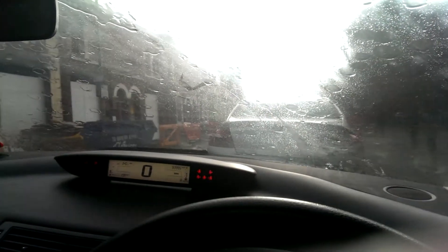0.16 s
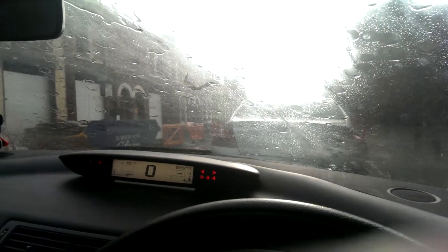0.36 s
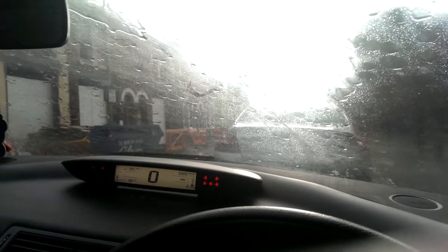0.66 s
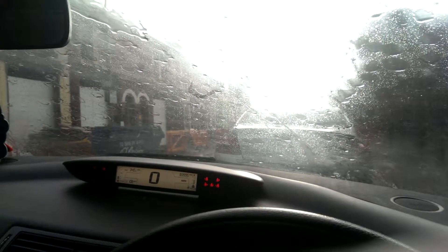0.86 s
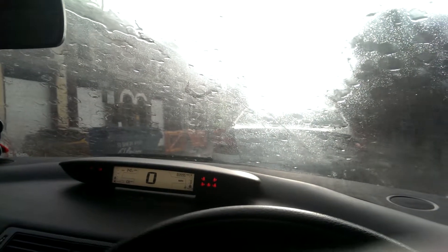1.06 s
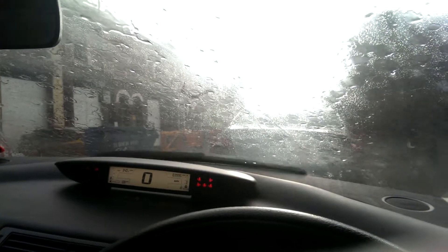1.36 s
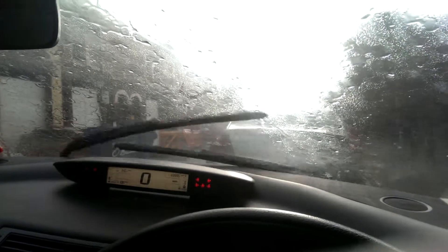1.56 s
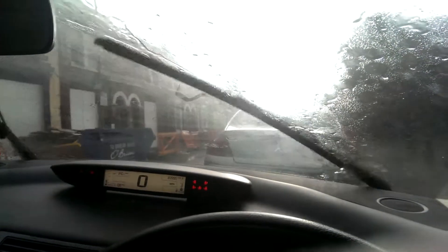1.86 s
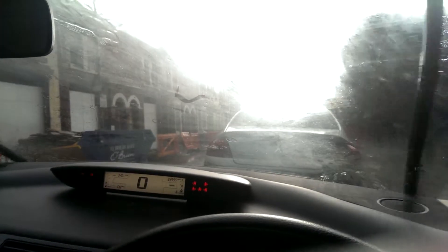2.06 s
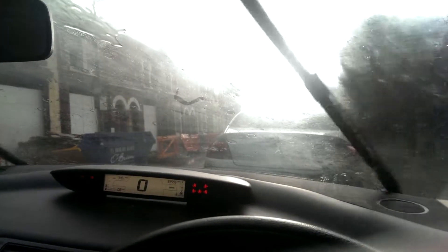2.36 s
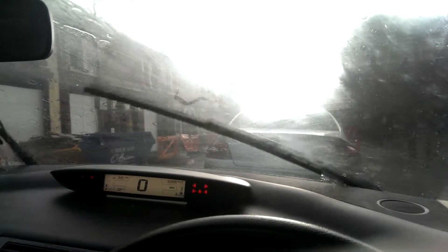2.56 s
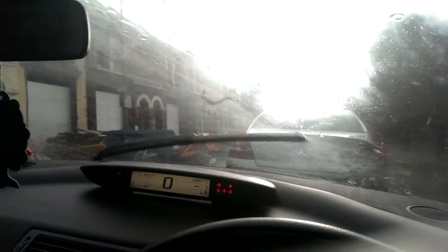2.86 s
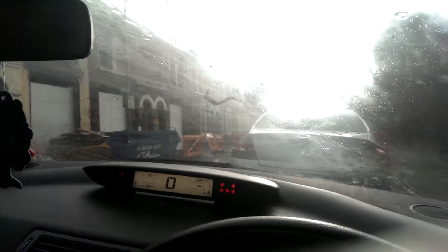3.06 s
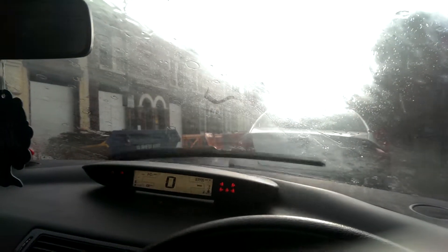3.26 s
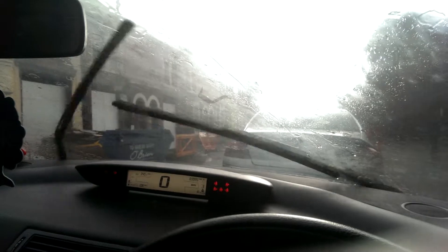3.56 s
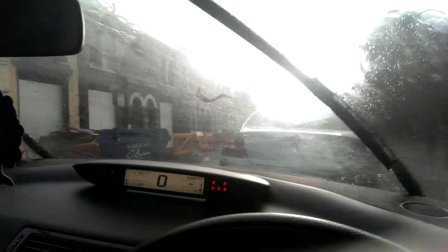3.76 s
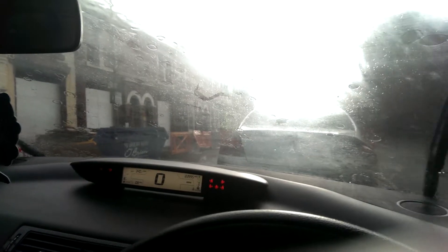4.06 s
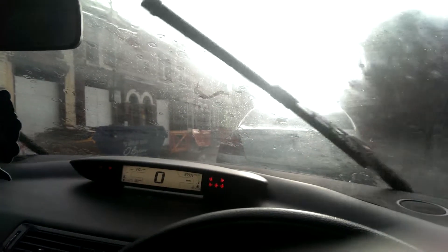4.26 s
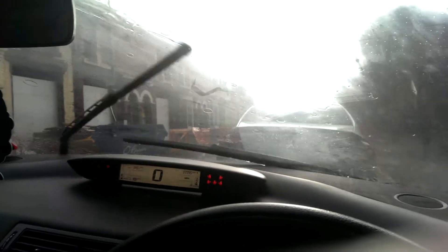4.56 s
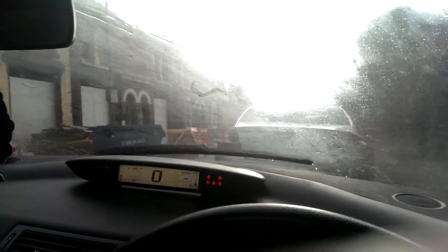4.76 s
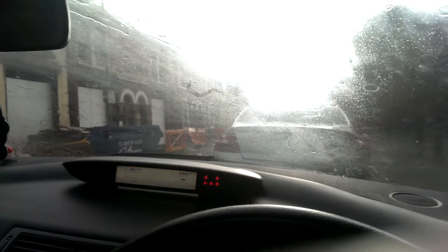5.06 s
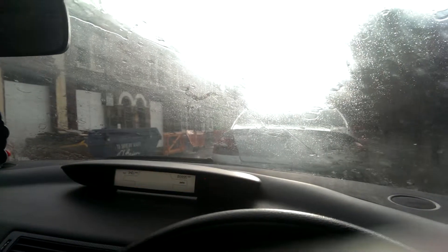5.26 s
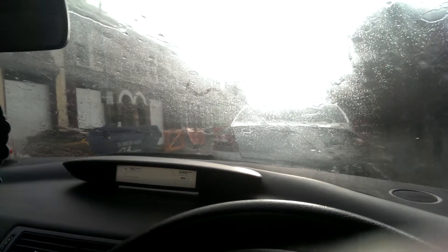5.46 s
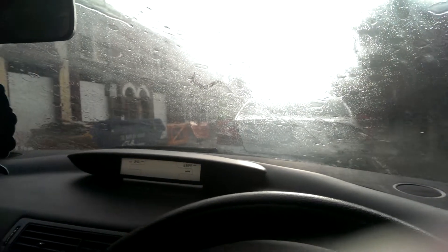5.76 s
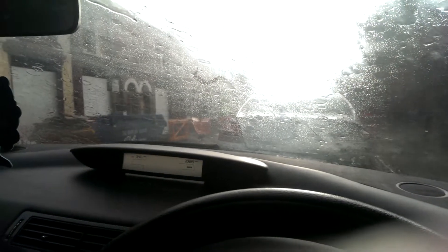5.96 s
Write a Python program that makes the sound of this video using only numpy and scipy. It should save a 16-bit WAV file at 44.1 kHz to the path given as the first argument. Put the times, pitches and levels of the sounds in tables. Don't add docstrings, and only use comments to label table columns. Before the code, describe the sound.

Steady downpour heard from a car cabin: grainy patter on glass over a boxy roof rumble, with scattered heavy drops. The wipers make two sweeps in the middle, thumping low and woody at the turns and shaking the dashboard, the second one stuttering against the glass. They come to rest, leaving rain and one sharp splat near the end. The handheld-style stereo pickup is muffled, slightly hissy, with wide treble and centred bass.

```python
import sys
import numpy as np
from scipy import signal
from scipy.fft import rfft, irfft, next_fast_len
from scipy.io import wavfile

SR = 44100
rng = np.random.default_rng(int(sys.argv[2]) if len(sys.argv) > 2 else 0)


def digitize_waveform(pressure):
    field = np.atleast_2d(pressure).T
    bounded = np.clip(field, -1, 1)
    quanta = np.round(bounded * 32767).astype(np.int16)
    wavfile.write(sys.argv[1], SR, quanta)


def volts(x):
    e = np.asarray(x, float) / 20
    return 10 ** e


N = 270333
GLASS_FROM_HZ, ROOF_TO_HZ = 1043, 1330
MEAN_RAIN_DB = -36


def rms_one(x):
    return x / np.sqrt(np.mean(x ** 2) + 1e-20)


def in_time(rows):
    s, *columns = np.transpose(rows)
    return [np.interp(np.arange(N) / SR, s, c) for c in columns]


def at_hz(points, hz):
    table_hz, value = np.transpose(points)
    return np.interp(np.log(hz + 1), np.log(table_hz), value)


def drift(rate_hz):
    step = 40
    r = np.exp(-2 * np.pi * rate_hz * step / SR)
    noise = rng.standard_normal(N // step + 2002)
    slow = signal.lfilter([1], [1, -2 * r, r * r], noise)[2000:]
    return np.interp(np.arange(N) / step, np.arange(len(slow)), rms_one(slow))


def colour(x, db_at):
    size = 8192
    ceps = irfft(db_at(np.fft.rfftfreq(size, 1 / SR)) * np.log(10) / 20)
    ceps[..., 1:size // 2] *= 2
    ceps[..., size // 2 + 1:] = 0
    kernel = np.atleast_2d(irfft(np.exp(rfft(ceps))))
    return signal.oaconvolve(np.atleast_2d(x), kernel, axes=-1)[:, :N]


def band(x, low_hz, high_hz):
    sos = signal.butter(3, [low_hz, high_hz], "band", fs=SR, output="sos")
    return signal.sosfilt(sos, x)


def bursts(times_s, peak_db, t60_s, rise_s, longer_db=0):
    length = 9000
    out, t = np.zeros(N + length), np.arange(length) / SR
    for s, db in zip(times_s, peak_db):
        at = round(s * SR)
        own_t60_s = max(t60_s * volts(longer_db * (db - max(peak_db))), 0.01)
        out[at:at + length] += volts(db - 60 * t / own_t60_s) * np.minimum(t / rise_s, 1)
    return out[:N]


# (frequency [Hz], density [dB per Hz])
CABIN_COLOUR = [(120, -26.5), (200, -10), (308, 2), (388, -3), (529, -5), (646, -0.5), (731, -4.5),
                (1090, -2.5), (1310, -6.5), (1960, -2), (2360, -3), (2930, -2), (4520, -16.5),
                (5880, -35.5), (8000, -54.5), (10400, -73.5), (17600, -120)]
# (frequency [Hz], width [Hz], level [dB])
CABIN_RESONANCES = [(393, 290, 10), (1020, 130, 1), (2930, 420, -1.5), (317, 92, -7.5), (2480, 410, -1.74),
                    (3700, 610, 2.16)]


def cabin_db(hz):
    peaks_db = sum(db / (1 + ((hz - f) / (w / 2)) ** 2) for f, w, db in CABIN_RESONANCES)
    return at_hz(CABIN_COLOUR, hz) + peaks_db


# (frequency [Hz], likeness [0-1])
PORT_LIKENESS = [(60, 1), (200, 0.98), (350, 0.86), (600, 0.66), (1000, 0.46), (1600, 0.012)]


def ports(pair):
    size = next_fast_len(N)
    alike = np.clip(at_hz(PORT_LIKENESS, np.fft.rfftfreq(size, 1 / SR)), 0, 1)
    mid, side = rfft(pair, size) * np.sqrt([1 + alike, 1 - alike])
    return irfft(np.array([mid + side, mid - side]), size)[:, :N] / np.sqrt(2)


# (time [s], level [dB])
DOWNPOUR = [(0, -29), (.42, -34), (.85, -33), (1.24, -36), (1.6, -33.5), (1.8, -35), (1.95, -41),
            (2.6, -37), (2.92, -42), (3.5, -37.5), (3.96, -36.5), (4.2, -31.5), (4.45, -37.5), (4.64, -32),
            (4.9, -42), (5.5, -35.5), (5.92, -33), (6.13, -35)]
# (time [s], level [dB], length [s])
GUSTS_AND_LULLS = [(0.24, 1, 0.066), (1.515, 3.5, 0.01), (1.65, 3, 0.15), (2.044, -3, 0.035),
                   (2.511, 2.5, 0.016), (2.63, 1.5, 0.075), (2.89, -5, 0.051), (3.09, -1.5, 0.085),
                   (3.555, 3.5, 0.016), (3.735, 4, 0.028), (4.067, 3, 0.014), (4.293, 3.5, 0.02),
                   (4.622, 1.5, 0.077), (5.067, 3, 0.12), (4.03, 1.5, 0.018), (3.177, 3, 0.02),
                   (4.703, -0.5, 0.041), (5.213, 4, 0.051), (5.39, -3, 0.036), (5.93, 2.5, 0.033)]


def downpour():
    t = np.arange(N) / SR
    gusts_db = sum(db * np.exp(-((t - s) / length) ** 2) for s, db, length in GUSTS_AND_LULLS)
    return in_time(DOWNPOUR)[0] - MEAN_RAIN_DB + gusts_db


def drops(per_s, spread_db, clump_db):
    sizes = volts(spread_db * np.minimum(rng.exponential(1, N), 4.3)) * rng.choice([-1, 1], N)
    born = rng.random(N) < per_s / SR
    return sizes * born * volts(clump_db * (1.6 * drift(8.9) + 0.16 * drift(30)))


def panels(hits, t60_s, crack_db, count=11):
    t = np.arange(6000) / SR
    shape = volts(-60 * t / t60_s) + volts(crack_db - 60 * t / 0.015)
    size = next_fast_len(N + len(t))
    spot = rng.integers(0, count, N)
    out = 0
    for k in range(count):
        answer = rng.standard_normal((2, len(t))) * shape
        out = out + rfft(hits * (spot == k), size) * rfft(answer, size)
    return irfft(out, size)[:, :N]


# (frequency [Hz], density [dB per Hz])
LEAK_COLOUR = [(3240, -16), (5500, -3.5), (6630, -15.5), (8200, -17), (9880, -21), (14800, -23),
               (15900, -22)]


def rain():
    swing_db = downpour()
    hits = drops(per_s=2600, spread_db=3.5, clump_db=0.11)
    shower = ports(panels(hits, t60_s=0.063, crack_db=4.5))
    drumming = ports(panels(hits, t60_s=0.11, crack_db=-8.5))
    glass = rms_one(band(colour(shower, cabin_db), GLASS_FROM_HZ, 12600))
    roof = rms_one(band(colour(drumming, cabin_db), 184, ROOF_TO_HZ))
    leak = rms_one(colour(shower, lambda hz: at_hz(LEAK_COLOUR, hz)))
    out = volts(MEAN_RAIN_DB + swing_db + 2.5) * glass
    out += volts(-37 + 0.86 * swing_db) * roof
    return out + volts(-70.5 + 1.5 * swing_db) * leak


# (time [s], peak [dB], thud [dB], left-right [dB])
HEAVY_DROPS = [(0.0132, -18, -34, 2), (0.189, -19.5, -33, 11), (0.62, -21, -38, -1),
               (0.814, -16.5, -36, -2), (1.065, -17, -27, 0), (1.2974, -20, -43, -1),
               (1.3504, -18, -41, -1), (1.43, -21, -38, 10), (1.4623, -16.5, -25, 0), (1.601, -19, -25, -1),
               (1.696, -32, -26, -7), (2.0874, -21.5, -38, -2), (2.1817, -21.5, -36, -2),
               (2.262, -25.5, -37, -1), (2.375, -29, -40, 3), (2.48, -23, -41, 0), (2.926, -28.5, -49, 4),
               (3.0205, -21.5, -26, 0), (3.2196, -24, -30, -3), (3.568, -29, -40, -5),
               (3.8876, -23.5, -36, 5), (4.0103, -22, -37, -2), (4.044, -28, -37, 2), (4.128, -21, -23, -4),
               (4.3088, -15.5, -36, -6), (4.844, -22.5, -30, 2), (5, -23, -31, -4), (5.1175, -14.5, -42, 2),
               (5.168, -27, -27, 2), (5.696, -36, -29, -7)]


def heavy_drops():
    t60_s, rise_s = 0.097, 0.0023
    s, peak_db, thud_db, pan_db = np.transpose(HEAVY_DROPS)
    noise = ports(rng.standard_normal((2, N)))
    grain = colour(noise, lambda hz: cabin_db(hz) + 7.4 * np.log2(1 + hz / 2500))
    splat = np.array([bursts(s, peak_db - 7 + side * pan_db / 2, t60_s, rise_s) for side in (1, -1)])
    thud = bursts(s, thud_db - 6, 1.7 * t60_s, 2 * rise_s)
    out = splat * rms_one(band(grain, GLASS_FROM_HZ, 7000))
    return out + thud * rms_one(band(grain, 230, ROOF_TO_HZ))


# (frequency [Hz], density [dB per Hz])
BODY_COLOUR = [(12, -71), (20, -39), (48, -27.5), (85, -6), (94, -15), (107, -2.5), (140, -2.5), (172, 2),
               (211, -6), (300, -15.5), (390, -42.5), (660, -120)]
# (time [s], level [dB])
MOTOR_LOAD = [(0.0, -33), (0.03, -58), (0.51, -71), (2.03, -50), (2.1, -44), (2.78, -63), (3.87, -49),
              (3.91, -41), (4.18, -47), (4.23, -43), (4.35, -58), (6.13, -67)]


def boom():
    motor_db, = in_time(MOTOR_LOAD)
    rumble = colour(ports(rng.standard_normal((2, N))), lambda hz: at_hz(BODY_COLOUR, hz))
    shaking = np.hypot(volts(-43 + 0.6 * downpour()), volts(motor_db + 6))
    body = shaking * volts(1.34 * drift(21)) * rms_one(band(rumble, 119, 467))
    return body + volts(motor_db + 0.5) * rms_one(band(rumble, 21, 51.4))


# (time [s], peak [dB])
SPLASH_TICKS = [(0.041, -50), (0.189, -52), (0.2219, -53), (0.2952, -55), (0.4798, -54), (0.5407, -55),
                (0.7941, -52), (1.064, -60), (1.3523, -56), (1.5973, -55), (2.3565, -65), (3.9998, -64),
                (4.0412, -59), (4.2921, -54), (4.6174, -52), (4.7032, -54), (4.7656, -50), (4.9696, -57),
                (5.116, -38), (5.6516, -53.5), (5.8301, -64), (5.9189, -49)]
# (frequency [Hz], density [dB per Hz])
SPLASH_COLOUR = [(3000, -7), (5800, 17), (8000, -8), (11000, -13), (14500, -1), (16000, -22)]


def ticks():
    s, peak_db = np.transpose(SPLASH_TICKS)
    spray = colour(rng.standard_normal((2, N)), lambda hz: at_hz(SPLASH_COLOUR, hz))
    envelope = bursts(s, peak_db + 3.5, t60_s=0.066, rise_s=0.003, longer_db=0.2)
    return envelope * rms_one(spray) * volts([[-2.5], [1.5]])


# (time [s], peak [dB], pitch [Hz])
BLADE_KNOCKS = [(1.451, -20, 176), (1.745, -18.5, 146), (1.914, -17.5, 182), (2.257, -24, 169),
                (2.321, -8, 171.6), (2.509, -23, 169), (2.64, -25, 172), (3.138, -25.5, 164),
                (3.712, -14.5, 142), (3.82, -14.5, 143), (4.136, -9.5, 167), (4.22, -13, 158.3),
                (4.456, -24.5, 149), (4.537, -24, 146), (5.027, -24.5, 138)]
# (time [s], peak [dB], pitch [Hz])
BLADE_SLIPS = [(1.792, -27.5, 151), (1.884, -24.5, 145), (1.961, -20.5, 138.4), (2.034, -16.5, 148.4),
               (2.103, -17.5, 145.2), (2.192, -19, 149), (3.772, -18.5, 133), (4.084, -19, 150.7)]
# (time [s], peak [dB], pitch [Hz])
ARM_THUDS = [(1.607, -34, 426), (1.717, -23, 393), (1.761, -27, 382), (2.275, -26.5, 403), (2.38, -29, 420),
             (3.026, -28, 440), (4.637, -21, 455)]


def knocks():
    length = 9000
    out, t = np.zeros(N + length), np.arange(length) / SR
    kinds = [(BLADE_KNOCKS, 0.0097, 0.096), (BLADE_SLIPS, 0.028, 0.32), (ARM_THUDS, 0.0034, 0.059)]
    for rows, rise_s, t60_s in kinds:
        shape = volts(-60 * t / t60_s) * np.sin(np.pi / 2 * np.minimum(t / rise_s, 1)) ** 2
        for s, db, hz in rows:
            turn = 2 * np.pi * hz * t
            modes = np.sin(turn) + 0.076 * np.sin(0.724 * turn) + 0.12 * np.sin(1.27 * turn)
            at = round((s - 0.26 * rise_s) * SR)
            out[at:at + length] += volts(db) * shape * modes
    return out[:N]


# (time [s], pitch [Hz], level [dB])
BLADE_JUDDER = [
    [(3.84, 137.7, -49), (3.864, 144, -22.5), (3.896, 134, -25.5), (3.96, 153.7, -24), (4.022, 146, -23.5),
     (4.04, 147, -32), (4.07, 154, -30)],
]


def judder():
    out, t = np.zeros(N), np.arange(N) / SR
    for rows in BLADE_JUDDER:
        hz, db = in_time(rows)
        on = np.clip(np.minimum(t - rows[0][0], rows[-1][0] - t) / 0.009, 0, 1)
        tone = np.sin(2 * np.pi * np.cumsum(hz) / SR)
        out += on * np.sqrt(2) * volts(db + 0.8 * drift(25)) * tone
    return out


def wipers():
    return band(knocks() + judder(), 111, 2000)


def scene():
    return rain() + heavy_drops() + boom() + ticks() + wipers()


# (frequency [Hz], left-right [dB])
PORT_DIFFERENCE = [(60, -1.5), (200, -2.5), (350, 1.1), (760, -3), (1150, 0), (1500, 1), (2000, 5.5),
                   (2500, -1), (3000, -3), (3700, 3.5), (4500, 10), (5600, 0.5), (7000, -8.5), (10000, -12)]


def microphone(dry):
    heard = colour(dry, lambda hz: np.outer([0.5, -0.5], at_hz(PORT_DIFFERENCE, hz)))
    hiss = volts(-69) * band(rng.standard_normal((2, N)), 4000, 17000) * volts([[-5], [2.5]])
    return heard + hiss


def low_pass(x):
    return signal.sosfilt(signal.butter(12, 15760, fs=SR, output="sos"), x)


def record(dry):
    top = signal.ellip(8, 0.5, 60, 15600, fs=SR, output="sos")
    return low_pass(signal.sosfilt(top, microphone(dry)))


dry = scene()
out = record(dry)
digitize_waveform(out)
```